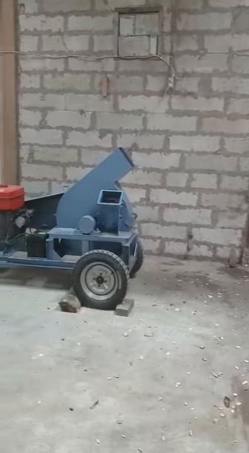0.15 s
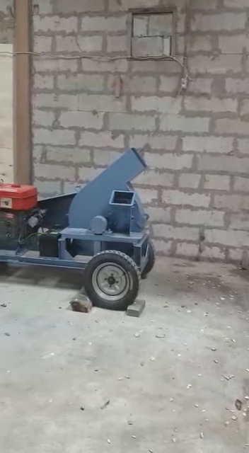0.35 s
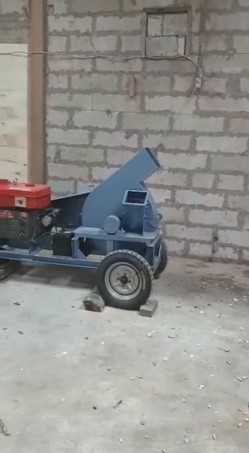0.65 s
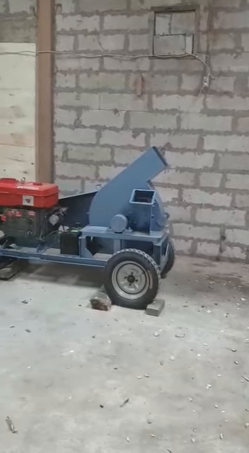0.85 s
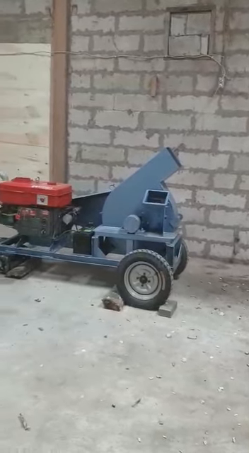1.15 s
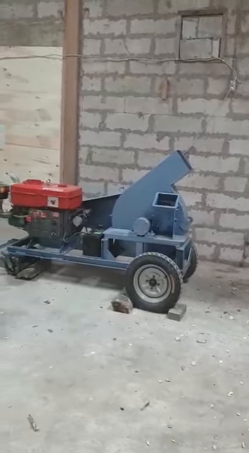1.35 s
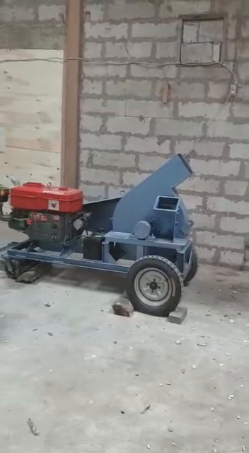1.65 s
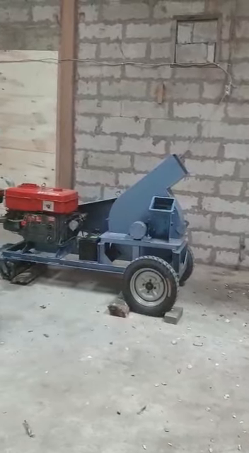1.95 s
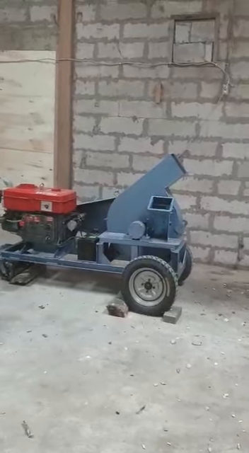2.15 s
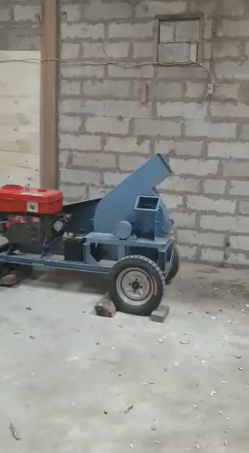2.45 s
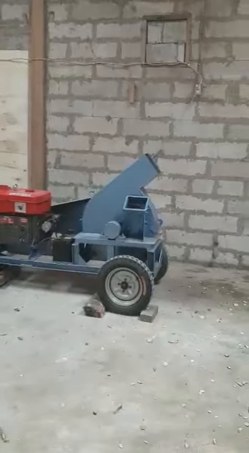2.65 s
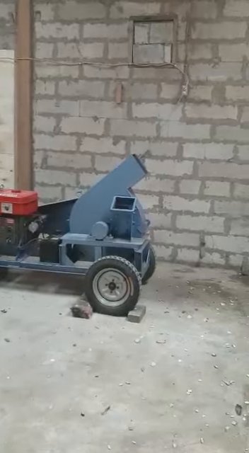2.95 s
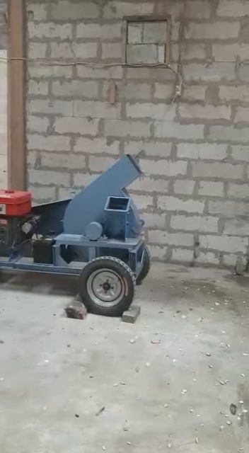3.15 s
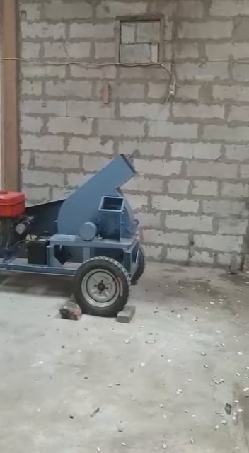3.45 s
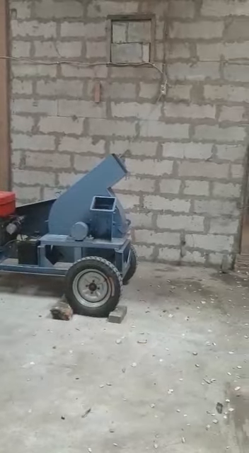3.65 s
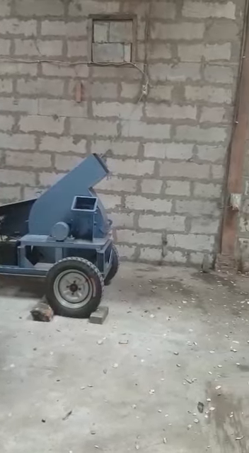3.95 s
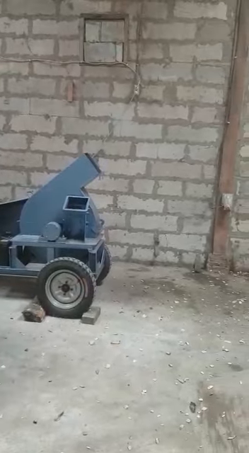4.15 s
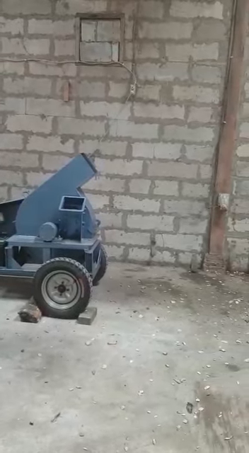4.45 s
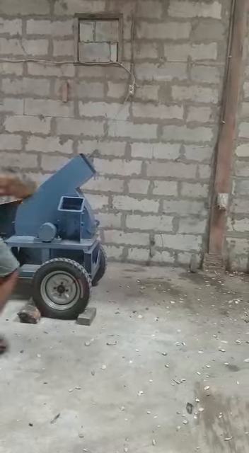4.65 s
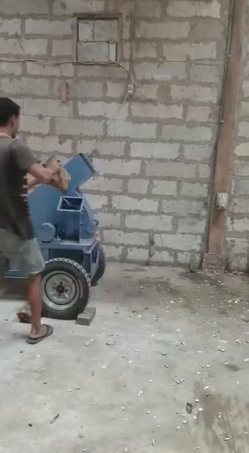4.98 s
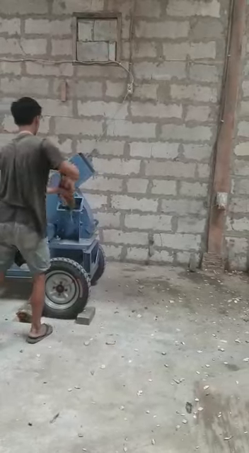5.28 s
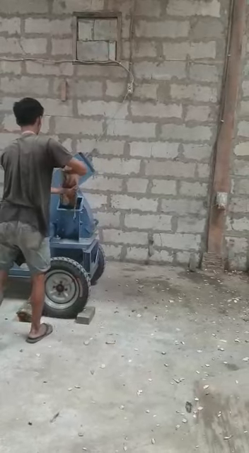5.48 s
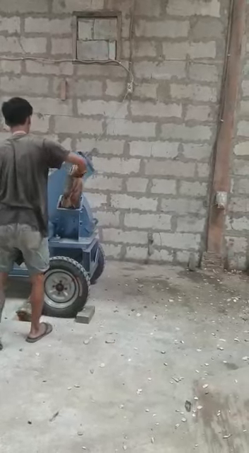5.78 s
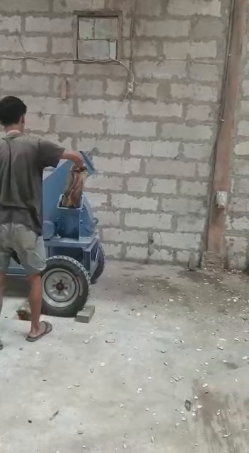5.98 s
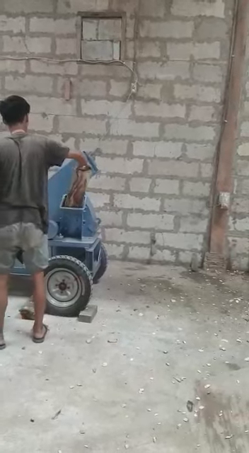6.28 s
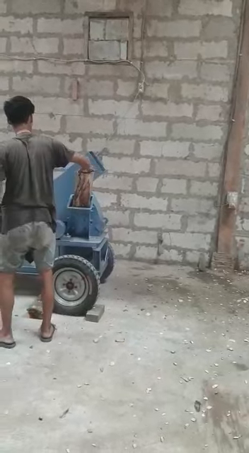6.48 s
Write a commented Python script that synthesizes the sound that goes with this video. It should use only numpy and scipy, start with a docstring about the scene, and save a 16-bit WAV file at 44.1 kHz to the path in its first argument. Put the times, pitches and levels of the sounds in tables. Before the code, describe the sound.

Close, hard-walled shed, hand-held phone: steady rapid engine chugging, about seventeen thuds a second, with clattering knocks and a pulsing fan and casing roar. It starts muffled and dips slightly before three seconds, then jumps much louder and clearer on the left, with gusty low noise and uneven surges. The right channel keeps only dark bass. No wood is heard being cut.

```python
"""A single-cylinder diesel drives an idling wood chipper in a block-walled shed, heard by a hand-held phone.
Every firing repeats the same thud, a sum of multiples of the firing rate, with ringing metal knocks on top.
Behind it is a roar of filtered noise for air and steel, swelling with the crank, and a low gusty noise.
The hand muffles both microphone ports until the grip shifts: the left port opens wide, the right keeps only
the bass. From then on the left port also surges: its sound swells and is cut short again and again."""
import sys
import numpy as np
from scipy import signal
from scipy.fft import rfft, irfft
from scipy.io import wavfile
from scipy.ndimage import uniform_filter1d

SR = 44100
rng = np.random.default_rng(int(sys.argv[2]) if len(sys.argv) > 2 else 0)


def master(y):
    """Save y as 16-bit WAV."""
    cut = np.clip(np.atleast_2d(y).T, -1, 1)
    pcm = np.round(cut * 32767)  # scale
    wavfile.write(sys.argv[1], SR, pcm.astype(np.int16))


N = 291942  # length in samples

FIRING_HZ = 16.912  # firings per second, before the drift of the crank
LEFT_OPENS_S, LEFT_OPEN_S = 2.897, 2.92  # the left port starts to open, is fully open


def amp(db):
    """Turn decibels into a plain factor."""
    return 10 ** (np.asarray(db) / 20)


def read(points, hz, column=1):
    """Read a column of a spectrum table, in straight lines on log frequency."""
    points = np.array(points)
    return np.interp(np.log(hz + 1), np.log(points[:, 0] + 1), points[:, column])


def noise(points):
    """Shape white noise to a steady spectrum, given in dB per Hz."""
    hz = np.fft.rfftfreq(N, 1 / SR)
    white = rng.standard_normal(N)
    # white noise of rms 1 spreads its power over SR / 2
    return irfft(rfft(white) * amp(read(points, hz)) * np.sqrt(SR / 2), N)


def patches(shape, bins, frames):
    """Smooth random field over frequency and time, rms 1."""
    field = uniform_filter1d(rng.standard_normal(shape), bins, 0)
    field = uniform_filter1d(field, frames, 1)
    return field / field.std()


def crank():
    """Count the firing cycles done so far; the crank drifts around an even beat."""
    # how far the crank runs ahead (+) or behind (-): t/s, lead/firing cycles
    drift = [(0.0, 0.0), (0.5, -0.0012), (1.6, -0.0093), (2.55, -0.0016), (3.4, 0.0005), (4.4, 0.0115),
             (6.0, -0.017), (6.62, -0.0212)]
    t = np.arange(N) / SR
    return FIRING_HZ * t + np.interp(t, *np.transpose(drift))


def firings(cycles):
    """Build one cycle of the engine from multiples of the firing rate; the crank plays it round and round."""
    # rms of multiples 1, 2, 3 .. before the port's colour and level: level/dB
    order_db = [-67, -45.5, -47.5, -41, -41, -52.5, -32, -28, -40.5, -33.0, -31, -40, -45.5, -32.5, -33.5,
                -22.5, -57, -33.5, -31, -32, -32, -28, -34.5, -26.5, -31, -29, -25.5, -32, -29.5, -37.5,
                -32, -42.5, -32.5, -32.0, -31, -57, -35.5, -29.0, -50, -31.5, -60, -34, -53, -40, -33, -52,
                -40, -25.5]
    # higher multiples that stand out: multiple -> level/dB
    strong = {61: -34, 67: -31, 74: -31, 92: -37.5, 97: -36}
    # when in the cycle each band of the thud arrives: f/Hz, arrival/firing cycles
    arrival = [(40, 0.4144), (80, 0.31), (135, 0.39), (200, 0.2907), (260, 0.2297), (400, .24)]
    # standing waves of the shed turn the sign over between these multiples and the next: multiple
    sign_turns = [2, 3, 9, 11, 18, 19, 20]
    scatter_hz = 420

    multiple = np.arange(1, 131)
    # past the listed levels the multiples scatter about a falling line
    extra = multiple[len(order_db):]
    extra_db = -42 + 4 * rng.standard_normal(len(extra)) - 0.12 * (extra - extra[0])
    level_db = np.r_[order_db, extra_db]
    level_db[np.array(list(strong)) - 1] = list(strong.values())

    # a later arrival makes the phase fall faster from one multiple to the next
    phase = -2 * np.pi * np.cumsum(read(arrival, (multiple - 0.5) * FIRING_HZ))
    phase += np.pi * np.searchsorted(sign_turns, multiple)
    # higher up the echoes of the walls scramble the arrival
    scrambled = 2 * np.pi * rng.random(len(multiple))
    phase += np.where(multiple * FIRING_HZ > scatter_hz, scrambled, 0)

    size = 2 ** 14  # samples in the stored cycle
    spectrum = np.r_[0, amp(level_db) * np.exp(1j * phase)]
    cycle = irfft(spectrum * size / np.sqrt(2), size)
    return np.interp(cycles % 1 * size, np.arange(size + 1), np.r_[cycle, cycle[0]])


def knocks(cycles):
    """Metal knocks: each rings a short fading tone once a cycle, a little early or late, soft or hard."""
    # place in the cycle, pitch, time to fade by 60 dB, level before the soft start and the spread:
    # place/firing cycles, f/Hz, t60/s, level/dB
    knock_table = [(0.199, 1504, 0.021, -17), (.5, 1031, .04, -15), (.58, 1688, 0.033, -22),
                   (.56, 2244, 0.044, -21), (.8, 1180, 0.03, -11), (.95, 724, 0.049, -22)]
    spread_db, jitter_s = 2.5, 0.00015  # typical spread in strength and timing

    t = np.arange(3000) / SR
    strokes = np.arange(int(cycles[-1]) - 1)
    out = np.zeros(N)
    for place, hz, t60, db in knock_table:
        late, hard = rng.standard_normal((len(strokes), 2)).T
        hits = np.searchsorted(cycles, strokes + place + late * jitter_s * FIRING_HZ)
        blows = np.zeros(N)
        blows[hits] = amp(spread_db * hard)
        soft_start = np.minimum(t / 0.0022, 1)
        tone = soft_start * amp(db - 60 * t / t60) * np.sin(2 * np.pi * hz * t)
        out += signal.oaconvolve(blows, tone)[:N]
    return out


def swell(cycles, place, sharp):
    """Smooth bump once a cycle that peaks at 1; a larger sharp makes it narrower."""
    return np.exp(sharp * (np.cos(2 * np.pi * (cycles - place)) - 1))


def air_roar(cycles):
    """Roar of fan, belts and casing: wide noise that swells twice a cycle."""
    # steady spectrum before the swells and the port's colour: f/Hz, level/dB per Hz
    roar_spectrum = [(30, -75), (100, -63.5), (200, -56.5), (400, -50), (800, -52), (1150, -50.5),
                     (1700, -55.5), (2800, -54.5), (3800, -55.5), (5500, -61), (7000, -66), (8300, -73),
                     (11500, -64), (14000, -73.5), (15500, -82)]
    swell_db = 2.2 * swell(cycles, 0.11, 2.7) + 1.16 * swell(cycles, 0.5, 3.7) - 1.59
    return noise(roar_spectrum) * amp(swell_db)


def casing_ring(cycles):
    """Ringing sheet steel: noise through one resonance, swelling twice a cycle, each cycle stronger or weaker."""
    # the resonance and its rms before the swells: f/Hz, width/Hz, level/dB
    hz, width, db = (2257, 144, -26)
    rung = signal.lfilter(*signal.iirpeak(hz, hz / width, SR), rng.standard_normal(N))
    rung *= amp(db) / rung.std()
    # one random strength for each cycle
    strength = rng.standard_normal(int(cycles[-1]) + 3)[(cycles + 0.65).astype(int)]
    swell_db = 5.6 * swell(cycles, 0.66, 3.5) + 4.3 * swell(cycles, 0.0, 1.7) - 3.0
    return rung * amp(swell_db + 0.83 * strength)


def roar(cycles):
    """Add the roar of air and the ringing steel; each call draws fresh noise."""
    return air_roar(cycles) + casing_ring(cycles)


def gust_noise():
    """Low noise, steady here; scene() makes it gusty and lets it into the open left port."""
    # spectrum before gusts and port level: f/Hz, level/dB per Hz
    gust_spectrum = [(20, -70), (100, -70), (270, -56.5), (450, -48.5), (800, -79), (1500, -89)]
    return noise(gust_spectrum)


def surges(t):
    """Bass, middle and treble lift in dB: each surge swells, holds, then is cut short."""
    # full lift of each surge; the cut begins at its end: start/s, end/s, bass/dB, middle/dB, treble/dB
    surge_table = [(2.94, 3.313, 7, 1.5, 2.5), (3.344, 3.61, 4, 1, 1.5), (3.704, 3.836, 4, 1, 0.5),
                   (3.918, 4.093, 3.5, 1, 1.1), (4.168, 4.744, 6.5, 2, 0.9), (4.78, 4.897, 3, 0.5, 0),
                   (5.037, 5.183, 3.5, 1.5, 0.5), (5.27, 5.507, 3, -1.1, -0.5), (5.614, 5.984, 2.5, 3, 1),
                   (6.03, 6.206, 3, 2, 1)]
    swell_share, cut_s = 0.34, 0.027  # share of a surge spent swelling; time it takes to drop
    start, end, *lifts = np.transpose(surge_table)[:, :, None]
    rise = (t - start) / (swell_share * (end - start))
    fall = 1 + (end - t) / cut_s
    shape = np.clip(np.minimum(rise, fall), 0, 1)
    return [(lift * shape).sum(0) for lift in lifts]


def slow_level(t, left_open):
    """Level at both ports in dB: slow changes, and a jump past the new rest that sinks back."""
    # slow level either side of the shift of the hand: t/s, level/dB
    level_table = [(0.0, 1), (1.8, -0.5), (2.84, -4.5), (2.97, 1), (4.8, 0.3), (5.8, -1), (6.15, -1.5),
                   (6.62, -2)]
    overshoot_db, settle_s = 6, 0.22
    slow = np.interp(t, *np.transpose(level_table))
    since = np.maximum(t - LEFT_OPEN_S, 0)
    overshoot = left_open * overshoot_db * np.exp(-since / settle_s)
    return slow, overshoot


def port_colours(hz, t, left_open, low, slow, overshoot):
    """Tone colour of the left and right ports in dB as the grip changes."""
    # colour compared with the open left port, before and after the shift of the hand:
    # f/Hz, left covered/dB, right before/dB, right after/dB
    port_table = [(30, 2, 5, 8.5), (70, 1.5, -3.5, 4.5), (130, 1.5, -2, 2), (210, 2.5, -6.5, -4),
                  (266, -4.5, -11, -10.5), (416, -14, -20, -19.5), (550, -13, -23, -21.5),
                  (800, -7.5, -15, -26.5), (1130, -7.5, -18, -29.5), (1740, -10.5, -18.5, -27.5),
                  (2160, -7, -14, -23), (3120, -19, -34.5, -42.5), (3960, -15, -29, -33.5),
                  (5460, -17, -32, -38.5), (6700, -20.5, -47, -54), (11500, -19, -41, -47),
                  (15500, -15, -36, -43)]
    rest_db, sag_db_per_s = -2, -0.94  # left bass between surges, once the port is open
    treble_hold, middle_hold = 0.93, 0.47  # share of the slow level change that left treble and middle resist

    since = np.maximum(t - LEFT_OPEN_S, 0)
    bass, middle, treble = surges(t)
    bass = bass + left_open * (rest_db + sag_db_per_s * since) - 0.54 * slow
    # treble and middle resist less of the overshoot
    middle = middle - middle_hold * (slow + 0.9 * overshoot) - 1.5
    treble = treble - treble_hold * (slow + 0.76 * overshoot) - 0.3

    high = 1 / (1 + (1800 / (hz[:, None] + 1)) ** 4)
    covered, before, after = (read(port_table, hz, column=c)[:, None] for c in (1, 2, 3))
    left_db = (1 - left_open) * covered + low * bass + high * treble + (1 - low - high) * middle
    right_moved = np.where(t > 2.91, 1.0, 0.0)  # the right port changes at once
    right_db = before + right_moved * (after - before)
    return left_db, right_db


def scene():
    """The machine reaches each port through its colour, which changes with the grip."""
    # how the ports compare: likeness of the roar left and right (held to 0-1), phase lead of everything
    # at the left port: f/Hz, likeness/0-1, lead/radians
    pair = [(30, .7, .4), (100, 0.75, 1.05), (256, 0.7, 0.97), (320, 0, 1.65), (590, 0.9, 1.6),
            (1300, 0.2, 1.1), (3000, 0, 2.46)]
    cycles = crank()
    parts = [firings(cycles) + knocks(cycles), roar(cycles), roar(cycles), gust_noise()]
    hz, t, (thud, roar_a, roar_b, gusts) = signal.stft(parts, SR, nperseg=2048, noverlap=1792)

    left_open = np.interp(t, [LEFT_OPENS_S, LEFT_OPEN_S], [0, 1])
    low = 1 / (1 + (hz[:, None] / 210) ** 4)  # 1 in the bass, 0 far above
    slow, overshoot = slow_level(t, left_open)
    level = slow + overshoot
    left_db, right_db = port_colours(hz, t, left_open, low, slow, overshoot)

    # thud and knocks waver slowly as the phone moves through the standing waves
    waver_db = 0.72 + 1.2 * (1 - low)
    left_thud = thud * amp(waver_db * patches(thud.shape, 1, 70))
    right_thud = thud * amp(waver_db * patches(thud.shape, 1, 70))
    # the phase of thud and knocks wanders at the right port, least in the bass
    right_thud = right_thud * np.exp(1j * 0.71 * (1 - low) ** 2 * patches(thud.shape, 3, 14))

    # under the hand the middle of the roar, around 1150 Hz, sinks further than the knocks
    around_middle = np.exp(-np.log((hz[:, None] + 1) / 1150) ** 2 / 0.25)
    damped = amp(-1.5 * (1 - left_open) * around_middle)
    roar_a, roar_b = roar_a * damped, roar_b * damped
    same = np.clip(read(pair, hz), 0, 1)[:, None]
    left_roar = roar_a * amp(0.78 * patches(thud.shape, 30, 10))  # flickers
    right_roar = same * roar_a + np.sqrt(1 - same ** 2) * roar_b

    gusts = gusts * left_open * amp(3.1 * patches(thud.shape, 40, 40))
    lead = read(pair, hz, column=2)[:, None]
    left = (left_thud + left_roar + gusts) * np.exp(1j * lead) * amp(left_db + level)
    right = (right_thud + right_roar) * amp(right_db + level)
    return signal.istft([left, right], SR, nperseg=2048, noverlap=1792)[1][:, :N]


def record(dry):
    """Round off peaks towards full scale, then cut everything above the band limit."""
    edge_hz = 15750
    soft = dry / (1 + abs(dry / 1.05) ** 5) ** (1 / 5)
    lowpass = signal.firwin(1023, edge_hz, window=("kaiser", 9), fs=SR)
    return signal.oaconvolve(soft, lowpass[None], "same")


dry = scene()
out = record(dry)
master(out)
```